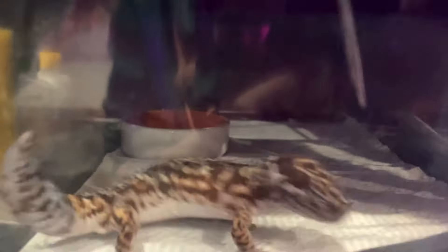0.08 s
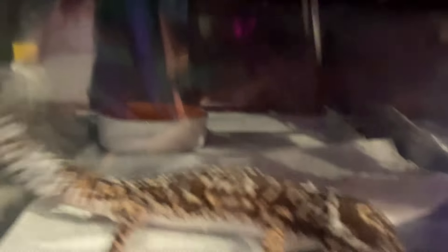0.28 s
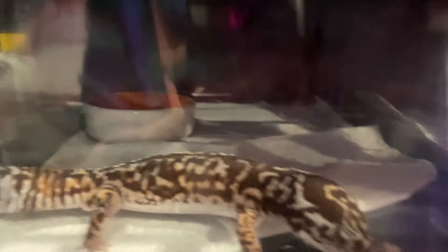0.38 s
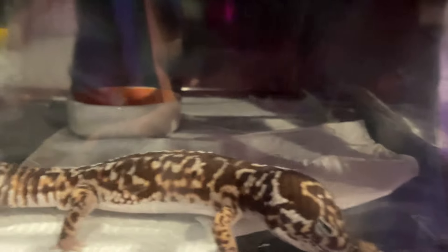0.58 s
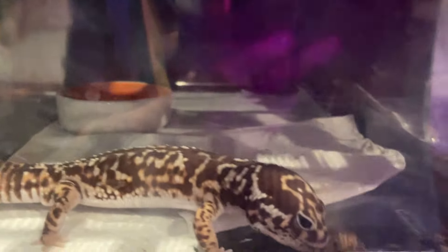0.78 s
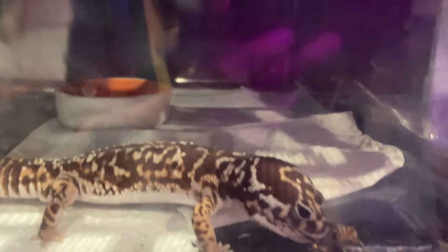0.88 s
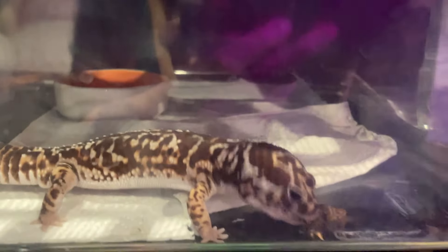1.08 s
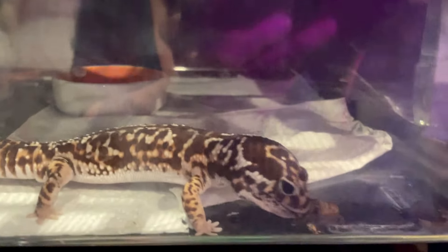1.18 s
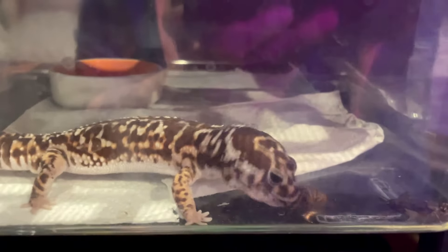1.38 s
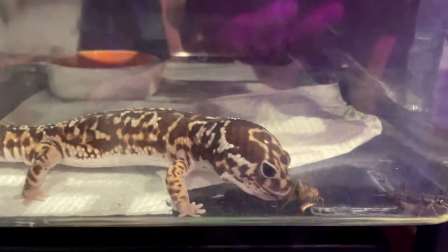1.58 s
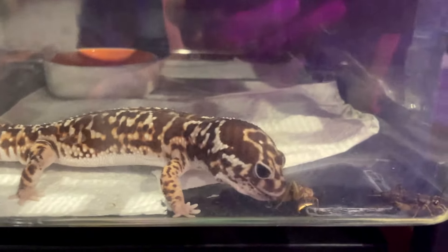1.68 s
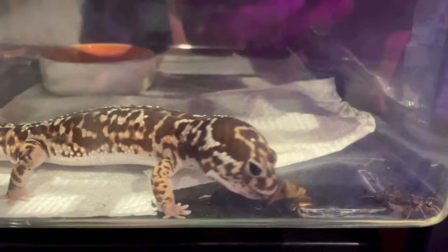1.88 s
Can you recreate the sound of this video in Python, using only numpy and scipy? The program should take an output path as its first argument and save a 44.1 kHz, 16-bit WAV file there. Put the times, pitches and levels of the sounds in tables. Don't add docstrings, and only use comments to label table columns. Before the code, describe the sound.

A gecko knocks its glass tank: soft double touch, a very loud hollow thud, then a weaker rebound, with brief papery scuffs. Tiny ticks follow over low room rumble and fan hum, close phone microphone.

```python
import sys
import numpy as np
from scipy import signal
from scipy.fft import rfft, irfft
from scipy.io import wavfile
from scipy.ndimage import uniform_filter1d

SR = 44100
rng = np.random.default_rng(int(sys.argv[2]) if len(sys.argv) > 2 else 0)


def convert_level_to_amplitude(level_db):
    exponent = np.asarray(level_db, float) / 20
    return 10 ** exponent


def dump_mix(stems):
    frames = np.atleast_2d(stems).T
    limited = np.clip(frames, -1, 1)
    pcm = np.round(limited * 32767).astype(np.int16)
    wavfile.write(sys.argv[1], SR, pcm)


N = 83790

# pitch_hz, level_db
RUMBLE_TONE = [(22, -27), (55, 0), (100, -3), (240, -13), (350, -22), (800, -33), (1500, -40.5),
               (2200, -44.5), (14000, -110)]
HISS_TONE = [(1500, -3.5), (3000, -0.5), (5000, -4.5), (7000, -3.5), (9000, -3), (12000, 1.5), (13900, 0),
             (14600, -70)]
RUMBLE_DB, HISS_DB, PATCH_DB = -50.5, -72.5, -1
SETTLE_DB, SETTLE_S = 6, 1
# pitch_hz, level_db, width_hz
FAN = [(100.3, -57.5, 2), (194.5, -61.5, 4.9), (244.5, -67.5, 2.7), (509, -80, 6.3), (1085, -77, 22)]
# pitch_hz, level_db
FAN_TONE = [(30, 0), (2000, 0), (6000, -40)]

# start_s, length_s, level_db, first_hz, last_hz
CREAKS = [
    (0, 0.066, -46.5, 395, 325),
    (.078, .065, -54.5, 545, 505),
]
CREAK_FALL_DB, CREAK_JITTER = -13, 0.4
# pitch_hz, level_db, width_hz
RING = [(4280, -68.5, 60), (4700, -78, 250), (10700, -72, 200)]
RING_END_S = 0.21

# start_s, length_s, level_db, body_db
SCUFFS = [(0, .19, -65, 6), (0.2, .035, -48, 0), (0.23, 0.044, -37.5, 1), (0.272, 0.021, -37, 9),
          (0.306, .035, -51, 4), (0.351, .02, -55.5, 5), (0.295, 0.14, -62, 6), (0.396, 0.03, -59.5, 6),
          (.33, .008, -54, -5), (0.447, .065, -62, -24), (0.685, .022, -69.5, 11),
          (0.841, 0.026, -59, 20.5), (.87, .022, -68, 12), (1.554, .03, -67, -4), (1.232, 0.025, -75, 13)]
# pitch_hz, level_db
SCUFF_TOP = [(2500, -30), (3600, -11.5), (5000, -5), (6000, -11), (7000, -1), (9000, 1.5), (14200, -8),
             (15400, -26)]
SCUFF_BODY = [(500, -17.5), (900, 1.5), (2000, -1.5), (3550, -6.5), (4000, -24.5), (6000, -39)]
SCUFF_EDGE_S, GRAINS_PER_S, GRAIN_DB = 0.004, 7500, -0.5

# pitch_hz, t60_s
ROOM_T60 = [(100, 0.2), (500, 0.17), (2000, 0.12), (6000, 0.067)]
ROOM_DB = -12

# start_s, level_db, t60_s, treble_db, boom_db
CLATTER = [
    (.158, -38, 0.18, -2, -31),
    (.2305, -11, .08, 2, -22),
    (.24, -25, .17, 4, -30),
    (.4495, -28, 0.09, -8, -36),
    (.46, -43, .3, -9, -42),
    (0.696, -63, .12, 0, -44.5),
]
# pitch_hz, level_db
CLATTER_TONE = [(80, -14), (200, 0), (700, 5), (1500, -12), (3000, -19), (5000, -32.5), (8000, -38.5),
                (16000, -50.5)]
BOOM_TONE = [(70, -8), (145, -1), (230, -10.5)]
BOOM_RISE_S, BOOM_T60_S = 0.0062, 0.47

# pitch_hz, level_db, t60_s
TOUCH_MODES = [(93, -37.5, 0.17), (150.6, -21.5, .15), (232.2, -32.5, 0.1), (370, -22, 0.064),
               (538, -30, 0.11), (709.6, -30, .1), (1014, -44.5, .1), (1160, -44, .06),
               (1980, -42.5, 0.037), (2200, -54, .08), (3400, -57, .05)]
STRIKE_MODES = [(136.6, -2.5, .13), (148.3, -17, 0.3), (297, 3.5, 0.04), (509, -3.5, 0.055), (215, -16, .1),
                (720, -9.5, .1), (937, -25, 0.12), (1134, -17, .085), (1240, -14, .055), (1456, -23.5, .1),
                (1880, -16.5, .06), (2090, -16.5, 0.05), (3450, -18.5, 0.022), (1663, -27, .08)]
REBOUND_MODES = [(144, -23.5, 0.26), (361, -25, 0.09), (525, -24, 0.083), (705, -22, 0.06),
                 (820, -22, 0.025), (955, -42, 0.18), (1104, -31, 0.05), (1382, -41.5, 0.042),
                 (1850, -49.5, 0.089), (2696, -50, 0.035), (3060, -55.5, 0.042), (620, -27, .03),
                 (1600, -40, .03)]
# start_s, level_db, low_modes_db
TOUCHES = [
    (0.1605, -5, -6),
    (0.1712, -7, 12),
]
STRIKES = [
    (0.2275, -30, 0),
    (0.231, 1.5, 1.5),
    (.2415, -13.5, -17),
    (0.287, -30, 14),
]
REBOUNDS = [
    (0.4501, 0, -9),
    (0.465, -9, 14),
    (.497, -30, 23),
]
RISE_CYCLES = (0.5, 0.61, 1.1)
LOW_HZ = 250
SPREAD_RAD, SPREAD_HZ = 0.55, 1200

# start_s, level_db, pitch_hz, t60_s, spread_octaves
TICKS = [(.2805, -36, 4000, 0.014, 0.81), (.351, -57, 3600, .014, .15), (.3508, -58, 5600, .004, .5),
         (.2265, -34, 520, .02, .4), (.8345, -48, 1400, 0.02, 0.15), (0.8346, -59, 2800, 0.014, 0.25),
         (1.2292, -54.5, 1400, 0.011, 0.2), (1.2292, -60, 2900, 0.009, 0.45),
         (1.2295, -55, 600, 0.012, 0.6), (1.2415, -60, 950, 0.012, 0.3),
         (1.5581, -49.5, 11490, 0.00557, .4), (1.5608, -51.5, 11700, .012, 0.22),
         (1.5582, -66.5, 4970, 0.0043, 0.99), (0.699, -54.5, 395, 0.089, 0.12)]

# middle_s, width_s, level_db
SLIDE = (1.18, 0.11, -68.5)
# pitch_hz, level_db
SLIDE_TONE = [(8500, -11), (10500, -3), (13500, -6), (14500, -60)]

# pitch_hz, likeness_0_to_1
FAR_SAME = [(60, .76), (250, 0.69), (640, .1), (3000, .2), (5500, .6), (7500, 0.985)]
NEAR_SAME = [(60, 0.7), (300, 0.65), (1500, 0.23), (3500, .6), (5500, 0.79), (7500, 0.99)]
# pitch_hz, lead_rad
PORT_RAD = [(0, 0), (4000, 0), (6000, -1.2), (8450, -3.05), (9150, -3.25), (10000, -4.7), (12300, -5.3),
            (13200, -2 * np.pi), (22050, -2 * np.pi)]
# pitch_hz, level_db
LEFT_DB = [(60, 1.5), (200, 4.5), (500, 1.5), (2400, 5), (4400, 6), (7500, 0.5)]
BASS_CUT_HZ, EVEN_HZ, EDGE_HZ = 28, 8000, 15650


def read(points, hz):
    f, value = np.transpose(points)
    return np.interp(np.log(hz + 1), np.log(f + 1), value)


def evened(x):
    return x / np.sqrt(np.mean(x ** 2) + 1e-20)


def colour(x, tone):
    hz = np.fft.rfftfreq(N, 1 / SR)
    above = np.maximum(np.log2((hz + 1) / tone[-1][0]), 0)
    below = np.maximum(np.log2(tone[0][0] / (hz + 1)), 0)
    return irfft(rfft(x) * convert_level_to_amplitude(read(tone, hz) - 20 * (above + below)), N)


def pair(a, b, same):
    c = np.clip(read(same, np.fft.rfftfreq(N, 1 / SR)), 0, 1)
    right = irfft(c * rfft(a) + np.sqrt(1 - c ** 2) * rfft(b), N)
    return np.array([a, right])


def gate(start, length, edge):
    t = np.arange(N) / SR - start
    return np.clip(t / edge, 0, 1) * np.exp(-np.maximum(t - length, 0) / edge)


def fuzzy(lines):
    out, t = np.zeros((2, N)), np.arange(N) / SR
    for hz, db, width in lines:
        pole = np.exp(-np.pi * width / SR)
        drive = rng.standard_normal((2, N)) + 1j * rng.standard_normal((2, N))
        wander = signal.lfilter([1], [1, -pole], drive)
        out += convert_level_to_amplitude(db) * evened((wander * np.exp(2j * np.pi * hz * t)).real)
    return out


def floor():
    rumble = convert_level_to_amplitude(RUMBLE_DB) * evened(colour(rng.standard_normal((2, N)), RUMBLE_TONE))
    hiss = convert_level_to_amplitude(HISS_DB) * evened(colour(rng.standard_normal((2, N)), HISS_TONE))
    z = signal.stft(rumble + hiss, nperseg=1024)[2]
    patches = rng.standard_normal(z.shape[1:])
    patches = uniform_filter1d(patches, size=12, axis=0)
    patches = evened(uniform_filter1d(patches, size=8, axis=1))
    drifting = signal.istft(z * convert_level_to_amplitude(PATCH_DB * patches), nperseg=1024)[1][:, :N]
    x = drifting + colour(fuzzy(FAN), FAN_TONE)
    settling = convert_level_to_amplitude(SETTLE_DB * np.exp(-np.arange(N) / SR / SETTLE_S))
    return settling * pair(*x, FAR_SAME)


def creaks():
    t, out = np.arange(N) / SR, np.zeros(N)
    for s, length, db, first_hz, last_hz in CREAKS:
        u = np.clip((t - s) / length, 0, 1.3)
        jitter = 1 + CREAK_JITTER * uniform_filter1d(rng.standard_normal(N), size=300)
        turns = np.cumsum((first_hz + (last_hz - first_hz) * u ** 2) * jitter) / SR
        squeak = sum(convert_level_to_amplitude(db + CREAK_FALL_DB * k) * np.sin(2 * np.pi * (k + 1) * turns) for k in range(3))
        out += gate(s - 0.005, length, 0.019) * squeak
    ring = gate(-0.08, RING_END_S + 0.11, 0.01) * pair(*fuzzy(RING), NEAR_SAME)
    return out + ring


def scuffs():
    slips = rng.random(N) < GRAINS_PER_S / SR
    sizes = convert_level_to_amplitude(GRAIN_DB * np.minimum(rng.exponential(1, N), 4))
    grains = rng.standard_normal((2, N)) * (0.3 + slips * sizes)
    top = pair(*evened(colour(grains, SCUFF_TOP)), NEAR_SAME)
    body = pair(*evened(colour(grains, SCUFF_BODY)), NEAR_SAME)
    out = np.zeros((2, N))
    for s, length, db, body_db in SCUFFS:
        env = gate(s - 1e-4, length, SCUFF_EDGE_S + 0.027 * length)
        out += convert_level_to_amplitude(db) * env * (top + convert_level_to_amplitude(body_db - 13.5) * body)
    return out


def room(x):
    taps = np.zeros((2, SR // 2))
    at = np.arange(300, SR // 2 - 20, 20)
    places = at + rng.integers(0, 20, (2, len(at)))
    np.put_along_axis(taps, places, rng.choice([-1., 1.], (2, len(at))), 1)
    hz, t, z = signal.stft(taps, SR, nperseg=256)
    decay = convert_level_to_amplitude(-60 * t / read(ROOM_T60, hz)[:, None])
    tail = signal.istft(z * decay, SR, nperseg=256)[1]
    tail = tail / np.linalg.norm(tail[0])
    echo = signal.fftconvolve(x.mean(0)[None], tail, axes=1)[:, :N]
    return pair(*echo, FAR_SAME)


def clatter():
    t, out = np.arange(N) / SR, np.zeros((2, N))
    noise = evened(colour(rng.standard_normal((2, N)), CLATTER_TONE))
    boom = evened(colour(rng.standard_normal((2, N)), BOOM_TONE))
    for s, db, t60, treble_db, boom_db in CLATTER:
        u = np.maximum(t - s, 0)
        tilted = colour(noise, [(0, 0), (800, 0), (4000, treble_db), (SR, 3 * treble_db)])
        rattle_env = convert_level_to_amplitude(db - 60 * u / t60) * np.minimum(u / 0.0015, 1)
        boom_env = convert_level_to_amplitude(boom_db - 60 * u / BOOM_T60_S) * np.minimum(u / BOOM_RISE_S, 1) ** 2
        out += rattle_env * pair(*tilted, NEAR_SAME) + boom_env * pair(*boom, NEAR_SAME)
    return out


def pane(modes, contacts, cycles):
    out, t = np.zeros((2, N)), np.arange(SR // 2) / SR
    hz, db, t60 = np.transpose(modes)[:, :, None]
    for s, hit_db, low_db in contacts:
        turn = rng.standard_normal((len(modes), 2))
        phase = 2 * np.pi * hz * t + 2 * turn[:, :1]
        spread = SPREAD_RAD * np.tanh(hz / SPREAD_HZ) * turn[:, 1:]
        rise = (1 - np.exp(-t * hz / cycles)) ** 2
        env = convert_level_to_amplitude(hit_db + db + low_db * (hz < LOW_HZ) - 60 * t / t60) * rise
        at = round(s * SR)
        for k in range(2):
            out[k, at:at + len(t)] += (env * np.sin(phase + k * spread)).sum(0)
    return out


def ticks():
    t, out = np.arange(4000) / SR, np.zeros(N)
    for s, db, hz, t60, spread in TICKS:
        places = np.linspace(-1, 1, 10)[:, None] + rng.uniform(-0.11, 0.23, (10, 1))
        phase = 2 * np.pi * rng.random(places.shape)
        rings = np.sin(2 * np.pi * hz * 2 ** (spread * places) * t + phase).sum(0)
        out[round(s * SR):][:len(t)] += convert_level_to_amplitude(db - 60 * t / t60) * np.minimum(t / 0.00034, 1) * rings
    return out


def slide():
    s, width, db = SLIDE
    swell = np.exp(-((np.arange(N) / SR - s) / width) ** 2)
    return convert_level_to_amplitude(db) * swell * evened(colour(rng.standard_normal(N), SLIDE_TONE))


def scene():
    knocks = (pane(TOUCH_MODES, TOUCHES, RISE_CYCLES[0])
              + pane(STRIKE_MODES, STRIKES, RISE_CYCLES[1])
              + pane(REBOUND_MODES, REBOUNDS, RISE_CYCLES[2]))
    near = creaks() + scuffs() + clatter() + knocks + ticks() + slide()
    return floor() + near + convert_level_to_amplitude(ROOM_DB) * room(near)


def top_cut(x):
    return signal.sosfilt(signal.butter(12, 15660, fs=SR, output="sos"), x)


def record(dry):
    hz = np.fft.rfftfreq(N, 1 / SR)
    lead = np.interp(hz, *np.transpose(PORT_RAD))
    half = convert_level_to_amplitude(read(LEFT_DB, hz) * (hz < EVEN_HZ) / 2) * np.exp(0.5j * lead)
    band = (hz < EDGE_HZ) / (1 + (BASS_CUT_HZ / (hz + 1)) ** 4)
    mix = irfft(rfft(dry) * [half, 1 / half] * band, N)
    return top_cut(np.clip(mix, -1, 1))


dry = scene()
out = record(dry)
dump_mix(out)
```